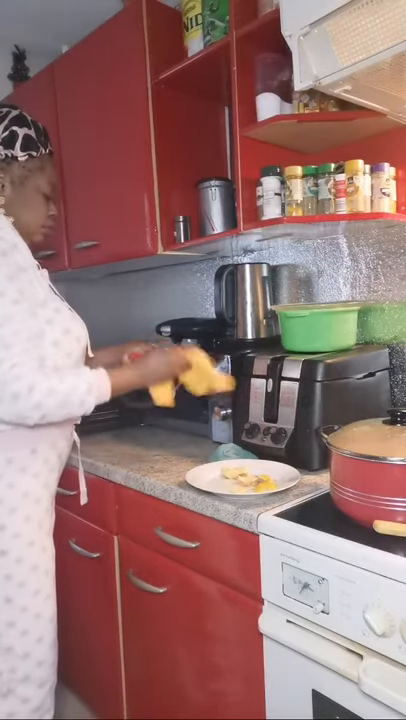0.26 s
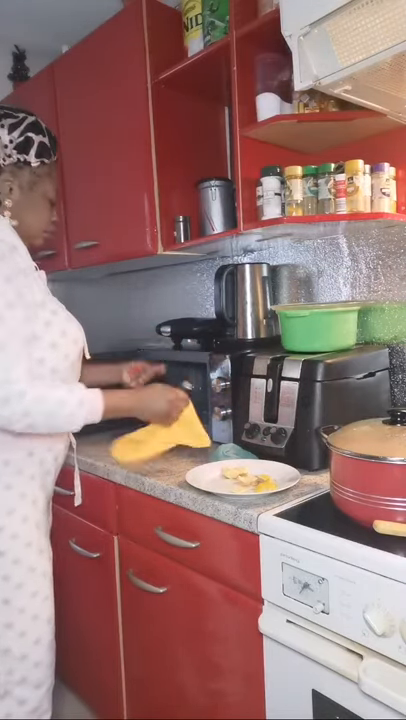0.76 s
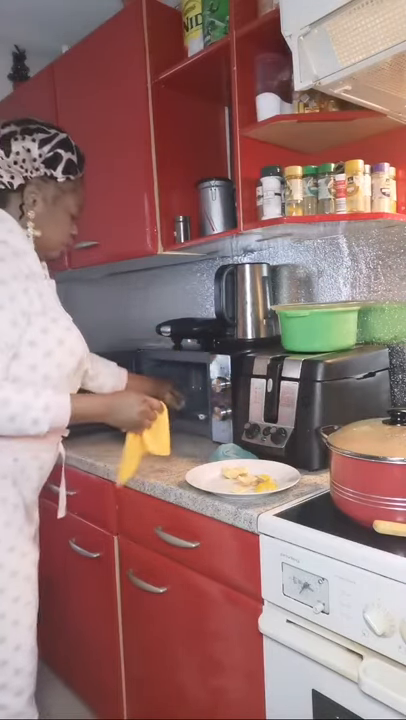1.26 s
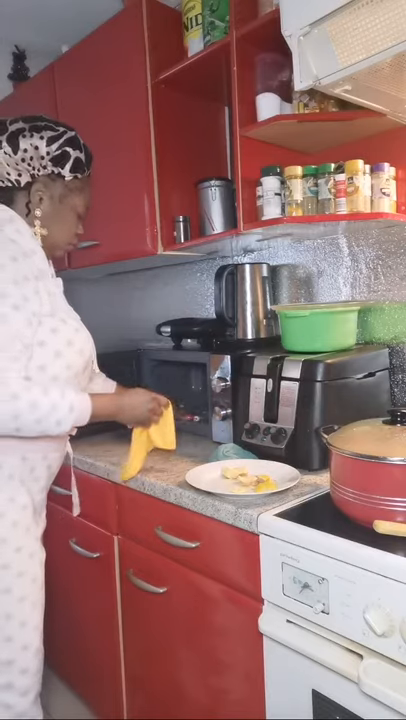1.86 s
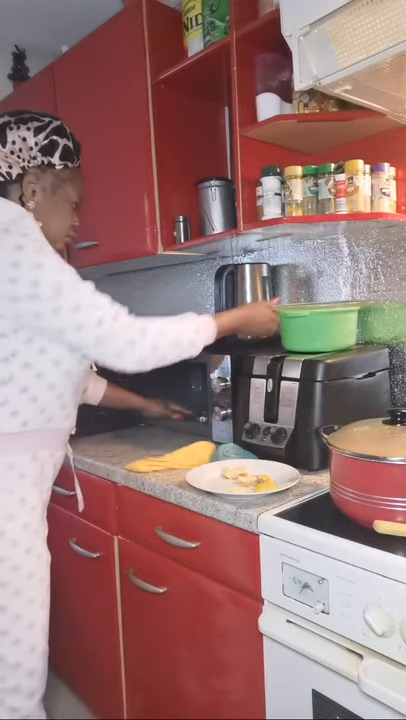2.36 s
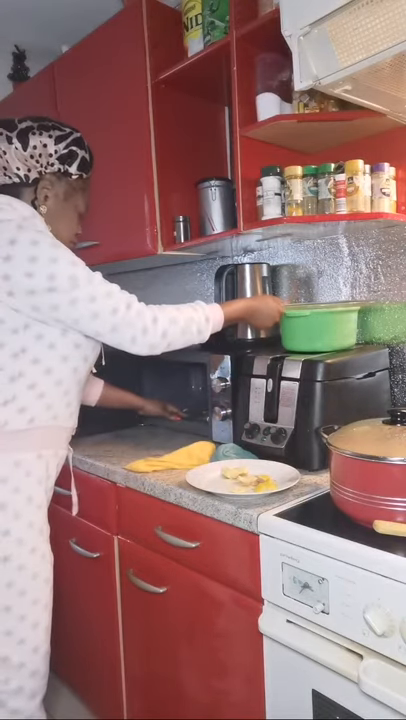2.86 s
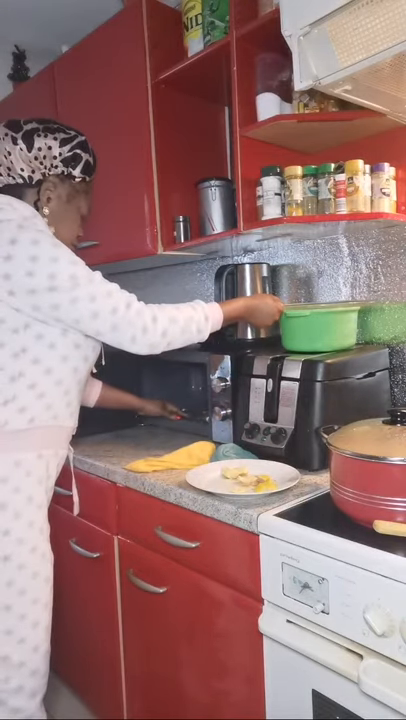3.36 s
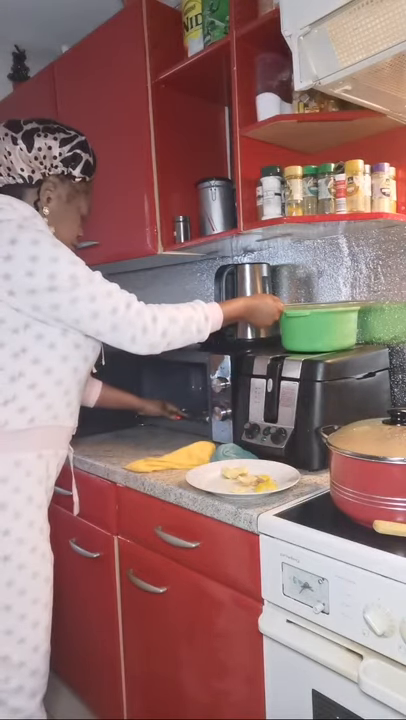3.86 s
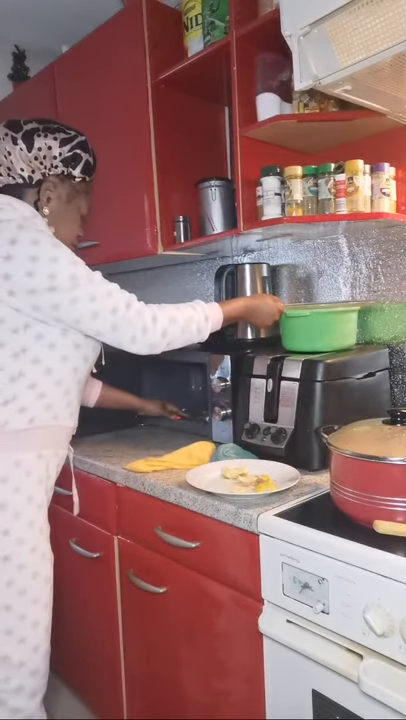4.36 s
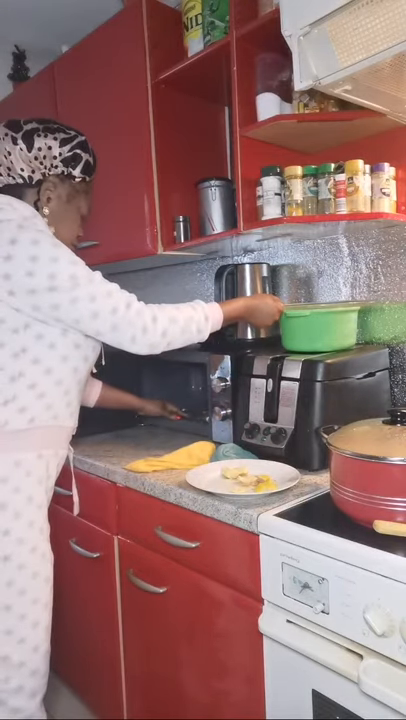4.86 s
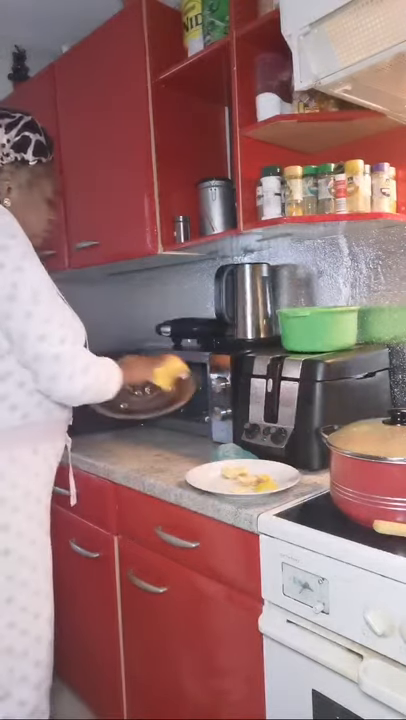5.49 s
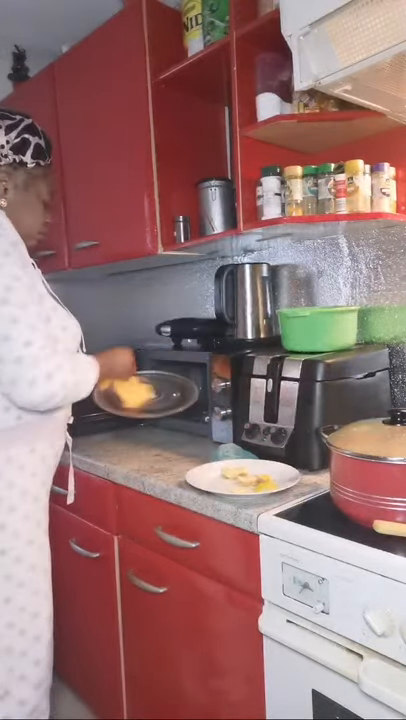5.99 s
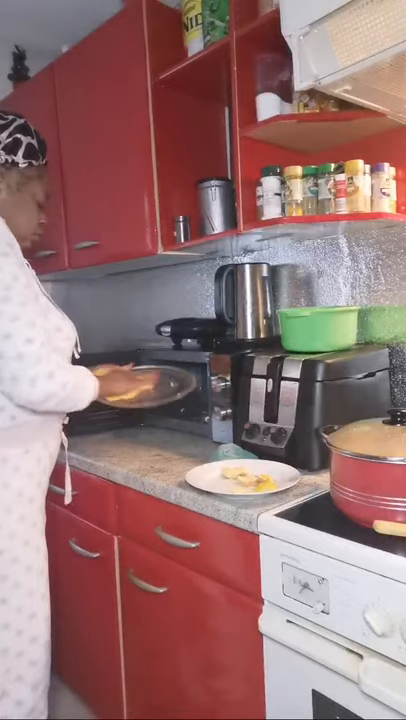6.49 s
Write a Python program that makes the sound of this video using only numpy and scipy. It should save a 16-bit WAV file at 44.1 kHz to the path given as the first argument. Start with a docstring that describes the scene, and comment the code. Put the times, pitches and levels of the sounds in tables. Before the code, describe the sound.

Ring and glass plate clatter hard inside a steel microwave cavity, then sliding, light glass clinks and finger squeaks over faint refrigerator hum.

```python
"""A microwave oven is cleaned in a small hard-walled kitchen while a refrigerator hums and the room hisses.
First come dull bumps and noise ticks from a plastic roller ring, then a short slide and a cloth wipe.
Next, ring and glass plate clatter in the steel cavity: shaped noise bursts over ringing wall tones.
The plate slides, clinks and grazes the wall (decaying tones), then squeaks under the fingers (bending tones).
After a last dull blow it is wiped with strokes of soft noise, squeaks again, and clinks at the end."""
import sys
import numpy as np
from scipy import signal
from scipy.fft import rfft, irfft, next_fast_len
from scipy.io import wavfile
from scipy.ndimage import map_coordinates

SR = 44100
rng = np.random.default_rng(int(sys.argv[2]) if len(sys.argv) > 2 else 0)


def pcm_store(signal):
    """Save signal as 16-bit PCM."""
    levels = np.round(np.clip(np.atleast_2d(signal), -1, 1) * 32767)
    wavfile.write(sys.argv[1], SR, levels.astype(np.int16).T)


N = 296793

# In the tables, levels are nominal and t60 is the time to fade by 60 dB.
# steady hiss of the room: f/Hz, level/dB
AIR_COLOUR = [(20, -38), (45, -10), (65, -15), (90, -12), (140, -7.5), (190, -5.5), (330, -7.5),
              (420, -15.5), (650, -15), (950, -25), (1850, -32), (2250, -28), (2900, -36), (5000, -37.5),
              (5400, -32.5), (5800, -38), (8000, -40), (8850, -30), (10000, -33.5), (12500, -35.5),
              (16000, -41)]
AIR_DB = -66  # level of the part above 400 Hz
# wavering refrigerator tones: f/Hz, level/dB, width/Hz (sets how fast the phase wanders)
FRIDGE_TONES = [(50, -70.5, 4.3), (89.6, -69, 4.6), (182.2, -62, 1.471), (254, -74, 14), (290.5, -67.5, 23),
                (313, -64, 6), (647, -78, 11)]
# dull bumps of oven and counter: t/s, f/Hz, level/dB
BUMPS = [(.005, 58, -50), (.249, 82, -49), (.32, 104, -43), (1.156, 239.6, -38.5), (1.16, 126, -49),
         (1.385, 400.4, -44), (1.744, 394, -43.5), (1.98, 319, -41.5), (3.256, 260, -53),
         (4.778, 130.6, -45.5), (4.795, 175.4, -45)]
BUMP_T60_S = 0.24
# ticks of the plastic roller ring: t/s, level/dB, brightest f/Hz
TICKS = [(.0178, -59.5, 8550), (.07, -57, 8450), (.1163, -53.5, 8500), (.3726, -56, 6700),
         (.5853, -47.5, 9400), (.6846, -66.5, 6630)]
# things pushed over the oven floor: t/s, length/s, level/dB
SLIDES = [(.861, 0.11, -56), (2.418, .041, -58), (3.09, 0.067, -55.5), (3.189, 0.26, -49.5),
          (3.38, 0.29, -52.5)]
# colour of the sliding noise: f/Hz, level/dB
SLIDE_COLOUR = [(88, -37.5), (150, -13), (317, -1), (356, -10), (401, -13), (492, -17), (1140, -37),
                (2170, -34.5), (5000, -48.5), (6500, -75.5), (11000, -120)]
# cloth brushing over glass: t/s, length/s, level/dB
WIPES = [(.88, .19, -72.5), (5.14, 0.19, -68), (5.4, .18, -68), (5.6, 0.11, -68.5)]
# colour of the cloth noise: f/Hz, level/dB
CLOTH_COLOUR = [(200, -18.5), (600, 1), (1500, -0.5), (3000, -8), (8000, -7), (16000, -7.5)]
# blows in the oven: t/s, body level/dB, body centre f/Hz, contact cut-off f/Hz,
# plastic snap level/dB, decay factor (no unit)
KNOCKS = [(1.15, -13, 1020, 12000, -18, 1.015), (1.171, -22, 500, 4000, -41, 0.73),
          (1.366, -26, 555, 8000, -26, 0.95), (1.388, -33.5, 2000, 8000, -35, 1),
          (1.419, -38, 3500, 12000, -30, 1.1), (1.434, -33, 5100, 14000, -16.5, 0.93),
          (1.462, -18, 1500, 7000, -38, 1.02), (1.645, -35, 1100, 7000, -37.5, 1.03),
          (1.671, -26.5, 650, 5000, -54.5, 1.05), (1.681, -37, 3500, 5200, -63, 0.97),
          (1.736, -21, 620, 8000, -43.5, .88), (1.961, -15.5, 1170, 9000, -28, .84),
          (1.985, -22.5, 348, 3000, -40, 0.72), (2.055, -42, 3500, 6000, -67, 0.78),
          (2.623, -35.5, 500, 1690, -85, 1.04), (2.698, -20, 1250, 5850, -46.5, 0.78),
          (2.716, -20, 650, 1800, -62, 0.73), (4.779, -44, 420, 750, -85, 0.73)]
BODY_FALL_DB = 2  # the body's loss one octave from its centre; it grows with the square of the distance
BODY_FLAT_HZ = 380  # below this a blow pushes all frequencies alike
SNAP_HZ = 7000  # the plastic ring snaps above this
WALL_RING_DB = -33  # ring of the steel walls against the body of a blow
# broad colour of the oven cavity: f/Hz, level/dB
CAVITY_COLOUR = [(60, -27.5), (130, -15), (230, -1.5), (400, 2.5), (700, -3), (1000, -5.5), (1350, -5),
                 (2100, -6), (3300, -6.5), (4500, -2), (6200, -6), (9000, -5), (15500, -6.5)]
# standing waves in the cavity: f/Hz, width/Hz, lift/dB
STANDING_WAVES = [(387.6, 38, 7), (596, 14, 8.5), (884, 39.3, 6), (922, 23, 5.5), (1023, 59, 4),
                  (1540, 18, 5), (1447, 30, 1.5), (1600, 25, 3), (1766, 20, 4), (2120, 35, 4.5),
                  (2247, 91, 1.5), (2810, 69, 3.5), (3210, 23, 1), (4330, 51, 4.5), (6760, 17, 8.5),
                  (8400, 57, 4.5), (9070, 360, 9.5), (10950, 220, 8.5)]
# tones of the oven's steel walls: f/Hz, level/dB, t60/s
STEEL_TONES = [(275, -15, .33), (598, -16, .4), (833, -11, .3), (868, -11, .38), (890, -10, .42),
               (939, -11, .35), (1056, -13, .25), (1090, -15, .3), (1168, -13, .55), (1782, -12, .22),
               (1819, -10, .22), (1846, -1.5, .24), (2064, -11, .3), (2078, -6.5, .43), (2592, -15, .52),
               (2875, -15, .3), (3548, -21, .32), (4823, -17, .24), (5367, -18, .2), (7299, -14, .18)]
# the first blow makes the bare steel clang: t/s, level/dB
CLANG = (1.158, -26)
# the plate rocks into its seat: t/s, level/dB
SEATING = [(1.964, -43), (2.003, -47.5), (2.055, -52)]
# tones of the plate seated in the oven: f/Hz, level/dB, t60/s
SEATED_TONES = [(389, -1, .26), (941, 0, .3), (1535, -7, .26), (1847, -5, .36), (2120, -6, .26),
                (2182, -6, .28), (2216, -5, .28), (2278, -5, .3), (2697, -10, .3), (3192, -11, .42),
                (3451, -10, .28), (4151, -11, .25), (4371, -11, .25), (5712, -14, .28)]
# light taps on the glass plate: t/s, level at the pivot/dB, tilt/(dB per octave), ring against contact/dB
CLINKS = [(3.5573, -53.5, 2, -17), (4.2242, -60, -5, -9), (5.0262, -69, 5, -7), (6.2283, -47, 7, -8),
          (6.2322, -51, 3.5, -8.5), (6.291, -64, -4, -7)]
TILT_PIVOT_HZ, TILT_TOP_HZ = 4530, 9200  # a tap's level holds at the pivot; its tilt ends at the top
# tones of the hand-held plate: f/Hz, level/dB, t60/s
GLASS_TONES = [(1540, -1, .28), (2135, -10, .28), (2680, -8, .24), (2950, -8, .2), (3400, -13, .2),
               (3990, -11, .2), (4490, -7, .26), (5400, -14, .16), (6140, -12, .22), (6998, -13, .24),
               (8260, -13, .2), (8802, -4, .26), (10810, -7, .27), (14080, -15, .15)]
# colour of a hard contact on glass: f/Hz, level/dB
CONTACT_COLOUR = [(600, -22), (1500, -0.5), (2100, -5.5), (2900, 3), (3600, -11.5), (4500, -3.5),
                  (7600, -8), (9200, 1), (16000, -2)]
# the plate's rim grazes the oven wall: t/s, gain on its tones/dB
GRAZE = (3.5585, 7.9)
# tones of that graze before the gain: f/Hz, level/dB
GRAZE_TONES = [(2692, -65.5), (3268, -68), (3989, -71.5), (6148, -72), (6476, -74), (8306, -68),
               (9022, -67), (9335, -73), (10444, -74), (11170, -73)]
GRAZE_T60_S = 0.21
# fingers squeaking on glass: t/s, length/s, start f/Hz, end f/Hz, level/dB
SQUEAKS = [(4.07, .095, 848, 852, -59), (4.424, 0.132, 732, 774, -56.5), (4.53, .12, 838, 870, -55.5),
           (5.628, 0.136, 822, 788, -52.5), (5.62, 0.11, 1560, 1516, -63.5)]
# how long the room rings before any stretching: f/Hz, t60/s
ROOM_DECAY = [(200, 0.33), (900, 0.46), (2000, 0.46), (4500, 0.38), (8000, 0.29), (15000, 0.19)]
TOP_HZ = 16000  # upper band limit


def amp(db):
    """Turn decibels into a gain."""
    return 10 ** (np.asarray(db) / 20)


def unit(x):
    """Scale to an average strength (rms) of 1."""
    return x / np.sqrt(np.mean(x ** 2) + 1e-20)


def along(points, hz):
    """Read a curve of (frequency, value) points on a logarithmic frequency axis."""
    f, values = np.transpose(points)
    return np.interp(np.log(hz + 1), np.log(f + 1), values)


def filtered(x, response):
    """Make each frequency of x louder or softer, as response(hz) says."""
    size = next_fast_len(len(x) + 8192)
    gain = response(np.fft.rfftfreq(size, 1 / SR))
    return irfft(rfft(x, size) * gain, size)[:len(x)]


def noise(colour, size):
    """Noise of rms 1 with the given colour."""
    return unit(filtered(rng.standard_normal(size), lambda hz: amp(along(colour, hz))))


def wobble(rate, size):
    """A smooth random curve through rate random points a second."""
    points = rng.standard_normal(int(size * rate / SR) + 4)
    return map_coordinates(points, [np.arange(size) * rate / SR])


def add(track, start_s, x):
    """Mix x into the track from start_s seconds on."""
    part = track[round(start_s * SR):][:len(x)]
    part += x[:len(part)]


def rise(seconds):
    """One second of a curve that climbs smoothly to 1, as a soft start does."""
    return 1 - np.exp(-np.arange(SR) / SR / seconds)


def dying(x, stretch, bloom_hz):
    """Bass takes longest to build up between the walls; then each frequency dies at the room's speed."""
    hz, t, z = signal.stft(x, SR, nperseg=256)
    build = 1 - np.exp(-np.outer((hz / bloom_hz) ** 2, t + 1 / 1000) / .01)
    t60 = stretch * along(ROOM_DECAY, hz)[:, None]
    fade = amp(-60 * t / t60)
    return signal.istft(z * build * fade, SR, nperseg=256)[1][:len(x)]


def kitchen(x, wet_db):
    """Add the kitchen's reverberation, a dying noise tail, at about the same total power."""
    tail = dying(rng.standard_normal(SR // 2), 0.83, bloom_hz=80)
    wet = signal.fftconvolve(x, tail / np.linalg.norm(tail))[:len(x)]
    return (x + amp(wet_db) * wet) / np.hypot(1, amp(wet_db))


def ring(tones):
    """One second of dying tones, as a struck object rings; each call varies their levels a little."""
    hz, db, t60 = np.transpose(tones)[:, :, None]
    t = np.arange(SR) / SR
    size = amp(db + 1.5 * rng.standard_normal(hz.shape))
    waves = np.sin(2 * np.pi * (hz * t + rng.random(hz.shape)))
    return np.sqrt(2) * np.sum(size * waves * amp(-60 * t / t60), 0)


def crack(extra, life):
    """The loudness curve of a brief contact: its direct sound stands above the reflections."""
    t = np.arange(SR) / SR
    return (1 + extra * np.exp(-t / life)) * rise(.0006)


def background():
    """The refrigerator hums in wavering tones over the steady hiss of the room."""
    t = np.arange(N) / SR
    air = noise(AIR_COLOUR, N)
    air *= amp(AIR_DB) / np.std(filtered(air, lambda hz: hz > 400))
    hum = np.zeros(N)
    for hz, db, width in FRIDGE_TONES:
        level = amp(db + 0.82 * wobble(5.4, N))
        hum += level * np.sin(2 * np.pi * hz * t + 1.19 * wobble(2 * width, N))
    return air + np.sqrt(2) * hum


def bumps():
    """A soft contact swells over a few milliseconds, then its one low tone dies away."""
    out = np.zeros(N)
    for start_s, hz, db in BUMPS:
        add(out, start_s, amp(db) * ring([(hz, 0, BUMP_T60_S)]) * rise(.006))
    return out


def ticks():
    """The small wheels of the roller ring click in short noise bursts, without ringing tones."""
    out = np.zeros(N)
    for start_s, db, hz in TICKS:
        colour = [(hz / 12, -30), (hz / 2.36, -14), (hz * 0.53, -13), (hz, 0), (hz * 2.1, -11)]
        click = dying(noise(colour, SR), 1.08, bloom_hz=500) * crack(extra=0.85, life=0.0042)
        add(out, start_s, amp(db) * click)
    return out


def strokes(rows, colour):
    """Rubbing noise swells and fades with each stroke, catching unevenly on the way."""
    out = np.zeros(N)
    for start_s, length_s, db in rows:
        size = int(length_s * SR)
        level = amp(db + 2.2 * wobble(45, size)) * np.hanning(size) ** .5
        add(out, start_s, level * noise(colour, SR)[:size])
    return out


def cavity(hz):
    """The oven's colour in dB: a broad shape with narrow standing waves on it."""
    colour = along(CAVITY_COLOUR, hz)
    for centre, width, db in STANDING_WAVES:
        colour = colour + db / (1 + (2 * (hz - centre) / width) ** 2)
    return colour


def swell(tones):
    """A large panel takes a few milliseconds to swing up, and its ring flutters in the room."""
    return rise(0.0043) * kitchen(ring(tones), wet_db=-5)


def blow_clatter(body_db, centre_hz, cutoff_hz, snap_db, stretch):
    """A blow fills the cavity with dense noise; harder contacts centre higher."""
    # every point of contact favours other frequencies
    ripple = np.column_stack([np.geomspace(500, TOP_HZ, 300), 2.6 * rng.standard_normal(300)])

    def colour(hz):
        """A contact passes its body below the cut-off, plus the snap of the plastic above."""
        octaves = np.log2(np.maximum(hz, BODY_FLAT_HZ) / centre_hz)
        body = amp(body_db - BODY_FALL_DB * octaves ** 2)
        softness = 1 / np.hypot(1, (hz / cutoff_hz) ** 4)
        snap = amp(snap_db) * hz ** 2 / np.hypot(hz ** 2, SNAP_HZ ** 2)
        return np.hypot(body * softness, snap) * amp(along(ripple, hz) + cavity(hz))

    grit = filtered(rng.standard_normal(SR), colour)
    clatter = dying(grit, stretch, bloom_hz=648) * crack(extra=.7, life=0.0075)
    # small rebounds make the decay uneven
    return clatter * amp(1.3 * wobble(140, SR))


def knocks():
    """Blows clatter and set the steel walls ringing; the bare steel clangs and the plate rocks into its seat."""
    out = np.zeros(N)
    for start_s, body_db, *contact in KNOCKS:
        walls = amp(body_db + WALL_RING_DB) * swell(STEEL_TONES)
        add(out, start_s, blow_clatter(body_db, *contact) + walls)
    add(out, CLANG[0], amp(CLANG[1]) * swell(STEEL_TONES))
    for start_s, db in SEATING:
        add(out, start_s, amp(db) * swell(SEATED_TONES))
    return out


def damped_glass(hz):
    """The hand damps the glass, which widens each tone into a short rough resonance (lift in dB)."""
    return sum(10 / (1 + ((hz - centre) / (centre * .016)) ** 2) for centre, _, _ in GLASS_TONES)


def clinks():
    """Taps make the plate ring over a burst of contact noise; each tap's tilt favours high or low tones."""
    out = np.zeros(N)
    for start_s, level_db, tilt_db, ring_db in CLINKS:
        def strength(hz):
            """The tap's level in dB, tilted around the pivot."""
            octaves = np.log2(np.clip(hz, GLASS_TONES[0][0], TILT_TOP_HZ) / TILT_PIVOT_HZ)
            return level_db + tilt_db * octaves

        def contact_gain(hz):
            """The colour of the contact on the damped glass."""
            return amp(strength(hz) + along(CONTACT_COLOUR, hz) + damped_glass(hz))

        tones = [(hz, db + strength(hz), t60) for hz, db, t60 in GLASS_TONES]
        glass = kitchen(ring(tones), wet_db=0) * amp(2 * wobble(90, SR))
        grit = filtered(rng.standard_normal(SR), contact_gain)
        contact = dying(grit, 1.1, bloom_hz=500) * crack(extra=3, life=.0016)
        add(out, start_s, amp(ring_db) * glass + contact)
    return out


def graze():
    """A light touch of the rim on steel rings a thin cluster of high tones."""
    out = np.zeros(N)
    start_s, gain_db = GRAZE
    tones = [(hz, db, GRAZE_T60_S) for hz, db in GRAZE_TONES]
    add(out, start_s, amp(gain_db) * kitchen(ring(tones), wet_db=-5))
    return out


def squeaks():
    """Fingers stick and slip on glass: an unsteady gliding tone with a faint second harmonic."""
    out = np.zeros(N)
    for start_s, length_s, start_hz, end_hz, db in SQUEAKS:
        size = int(length_s * SR)
        pitch = np.linspace(start_hz, end_hz, size) * (1 + .04 * wobble(250, size))
        phase = 2 * np.pi * np.cumsum(pitch) / SR
        tone = np.sin(phase) + 0.057 * np.sin(2 * phase)
        add(out, start_s, amp(db) * np.hanning(size) ** .5 * tone)
    return out


def scene():
    """All sounds add up in the air into one channel; the handling sounds share one reverberation."""
    rubbing = strokes(SLIDES, SLIDE_COLOUR) + strokes(WIPES, CLOTH_COLOUR)
    handling = kitchen(bumps() + rubbing + squeaks(), wet_db=-6)
    return (background() + handling + ticks() + knocks() + clinks() + graze())[None]


def record(dry):
    """The recorder cuts the deepest bass and keeps nothing from its upper band limit on."""
    def response(hz):
        """Bass cut around 38 Hz and a sharp upper limit."""
        return (hz < TOP_HZ) * hz ** 4 / np.hypot(hz ** 4, 38 ** 4)

    return filtered(dry[0], response)[None]


dry = scene()
out = record(dry)
pcm_store(out)
```